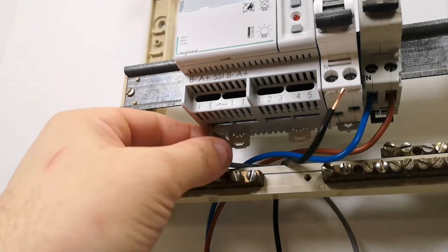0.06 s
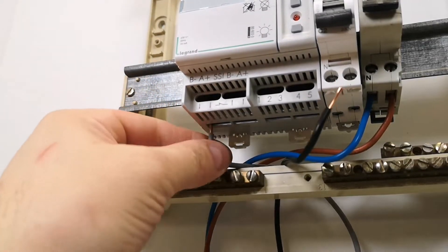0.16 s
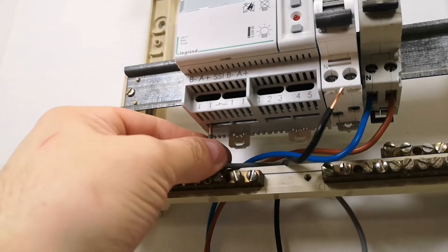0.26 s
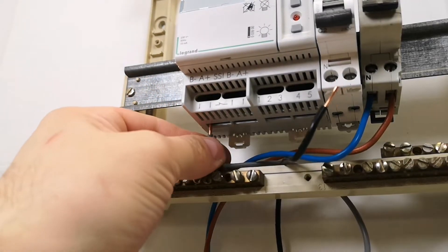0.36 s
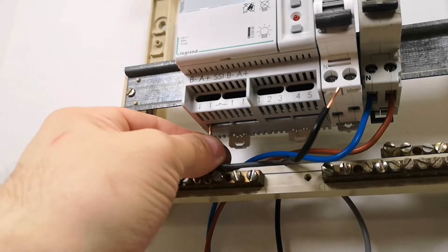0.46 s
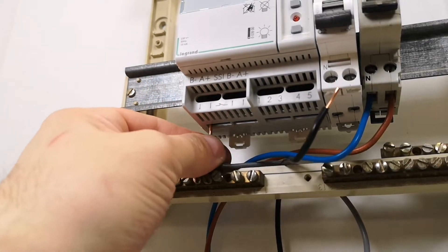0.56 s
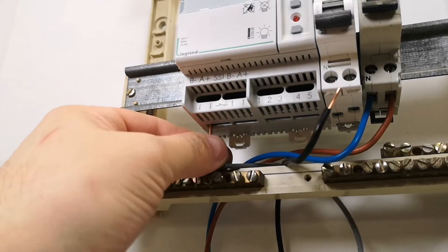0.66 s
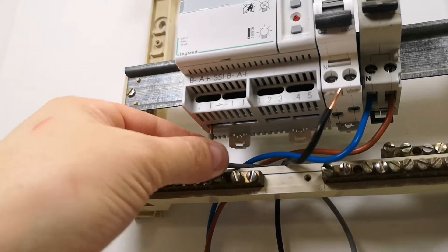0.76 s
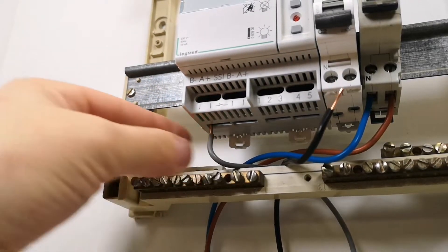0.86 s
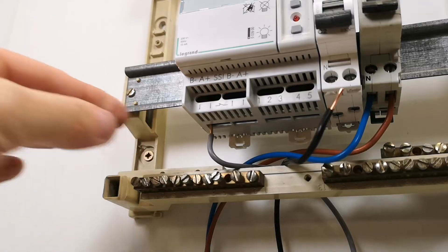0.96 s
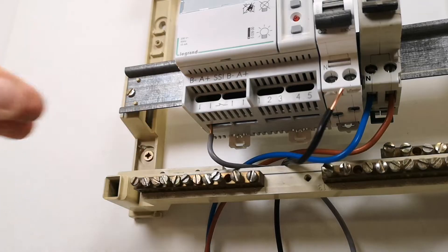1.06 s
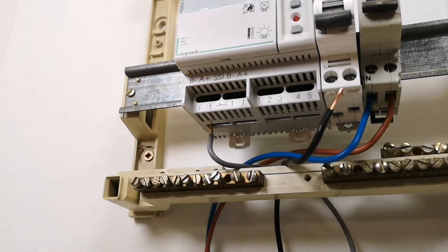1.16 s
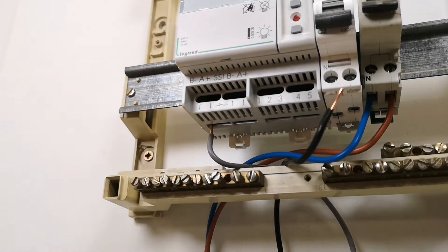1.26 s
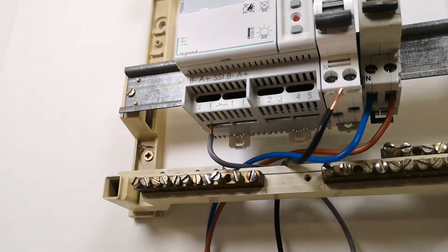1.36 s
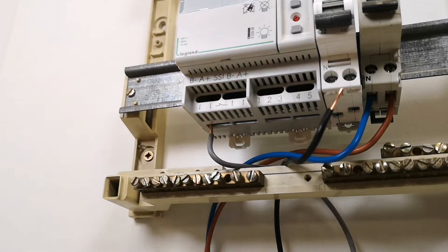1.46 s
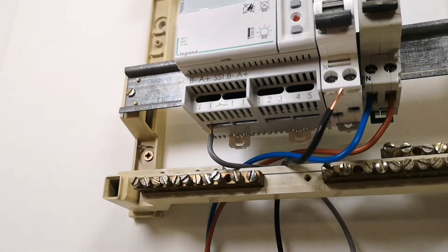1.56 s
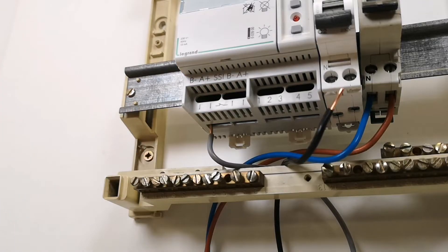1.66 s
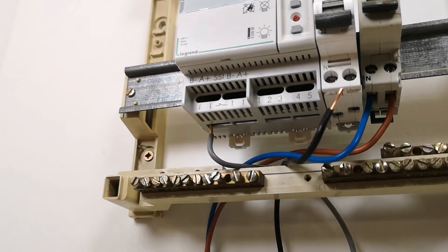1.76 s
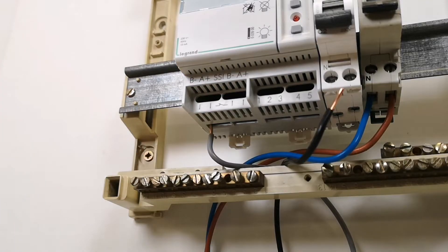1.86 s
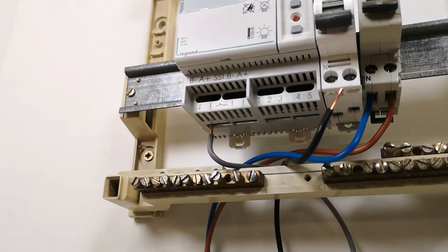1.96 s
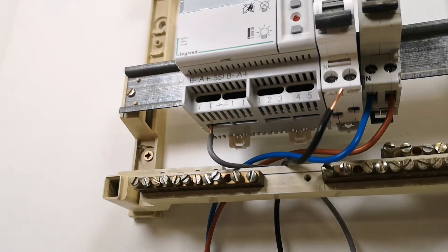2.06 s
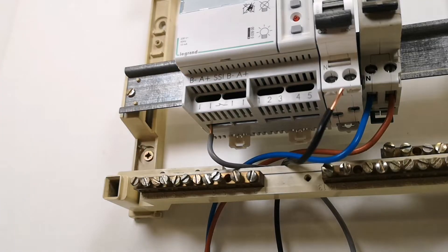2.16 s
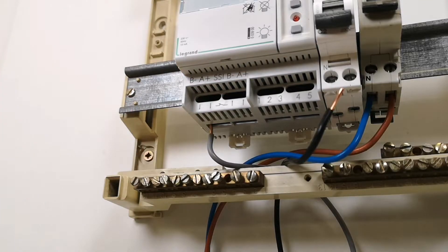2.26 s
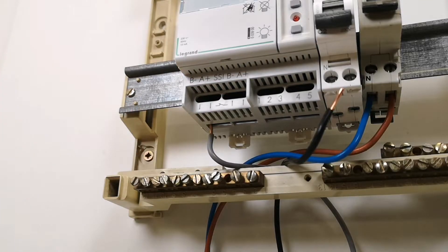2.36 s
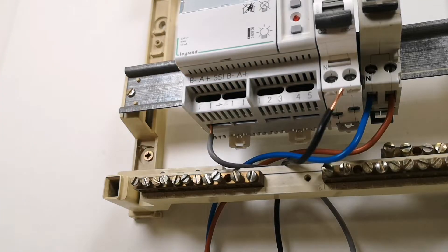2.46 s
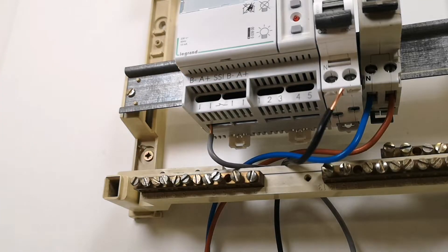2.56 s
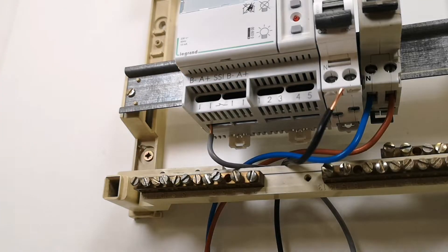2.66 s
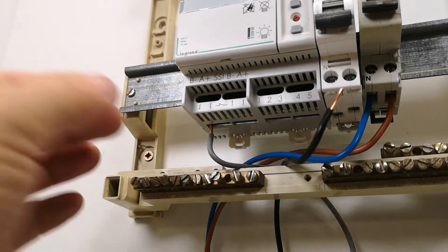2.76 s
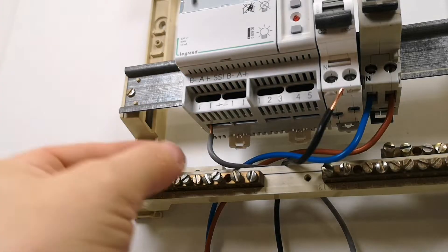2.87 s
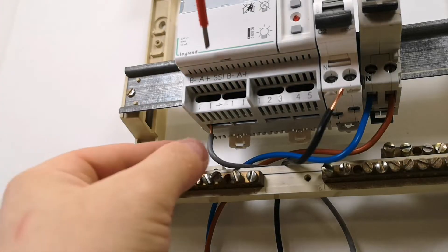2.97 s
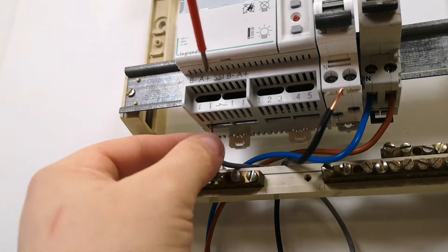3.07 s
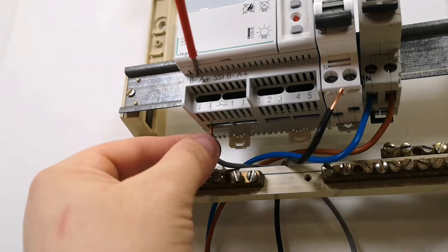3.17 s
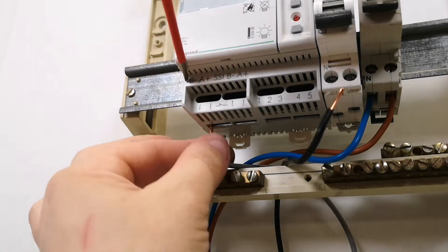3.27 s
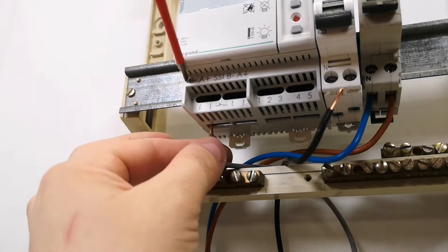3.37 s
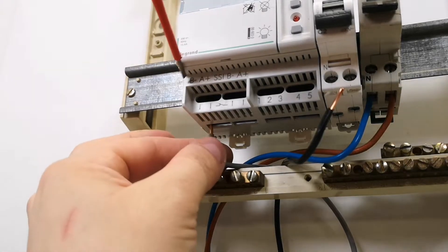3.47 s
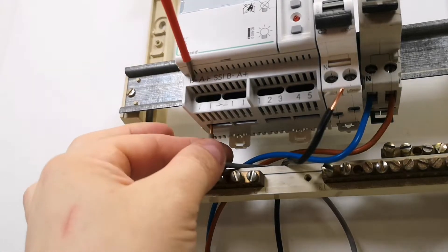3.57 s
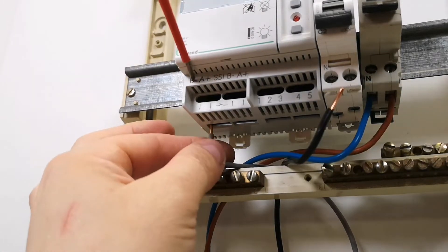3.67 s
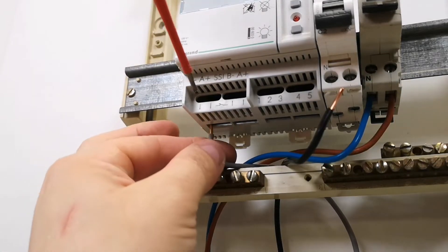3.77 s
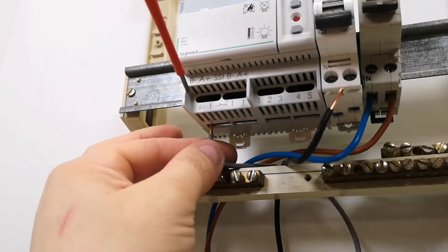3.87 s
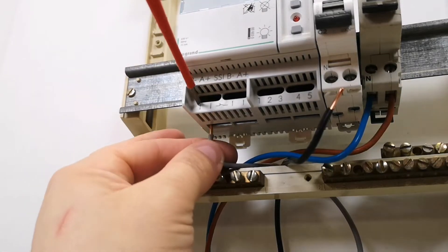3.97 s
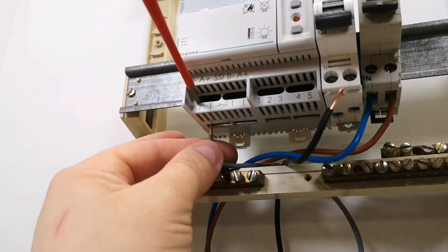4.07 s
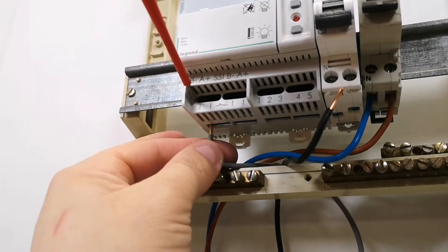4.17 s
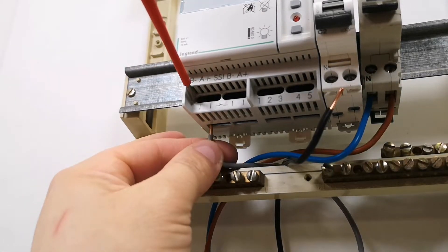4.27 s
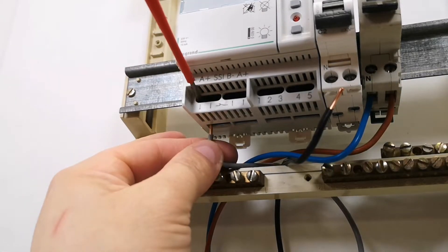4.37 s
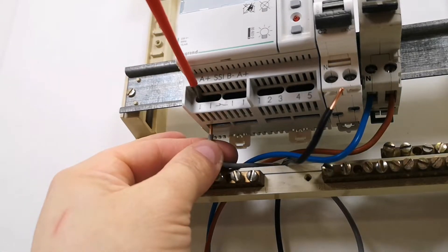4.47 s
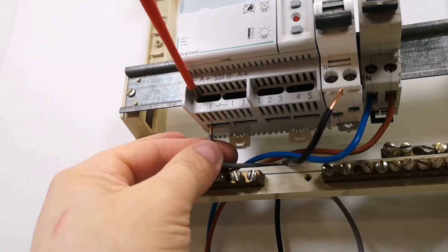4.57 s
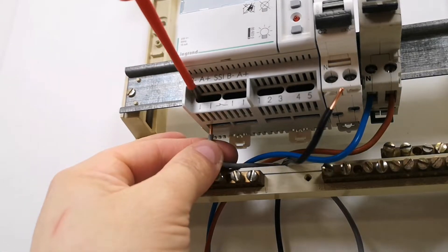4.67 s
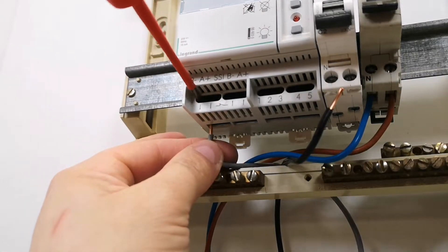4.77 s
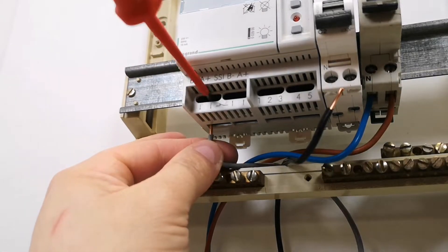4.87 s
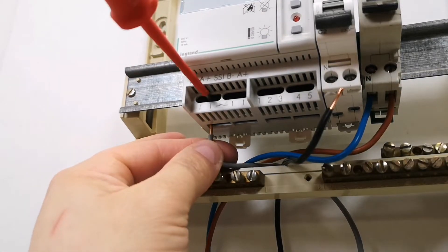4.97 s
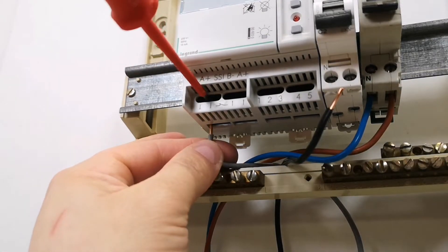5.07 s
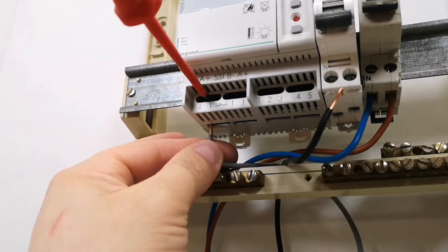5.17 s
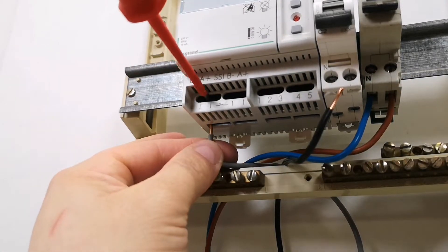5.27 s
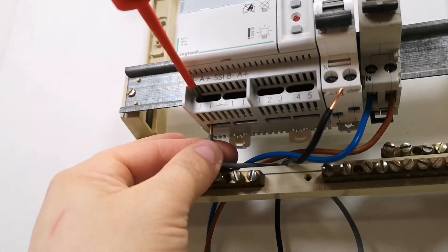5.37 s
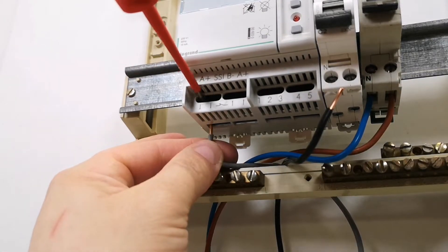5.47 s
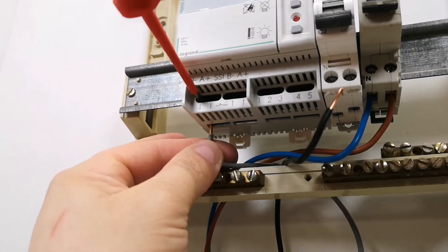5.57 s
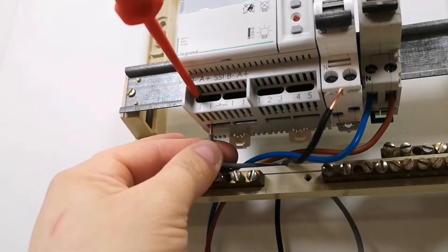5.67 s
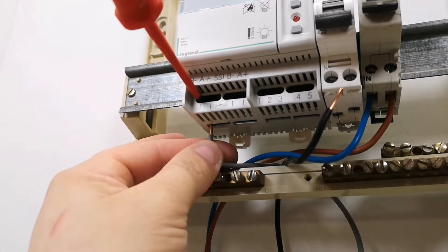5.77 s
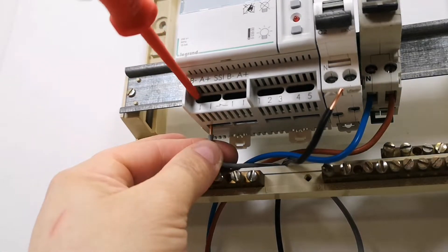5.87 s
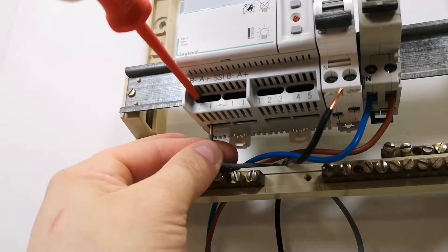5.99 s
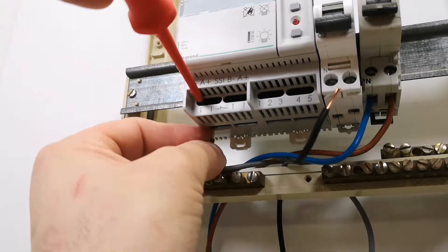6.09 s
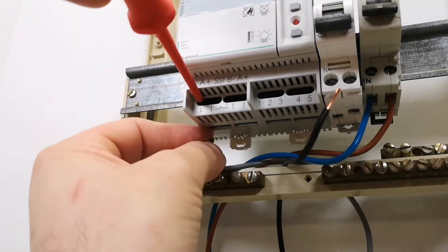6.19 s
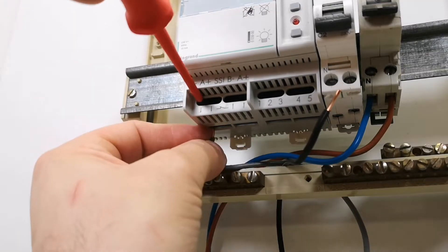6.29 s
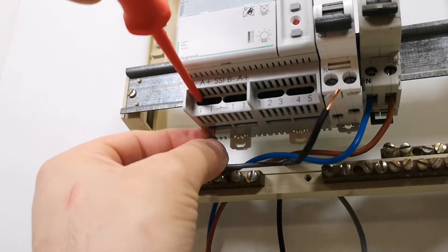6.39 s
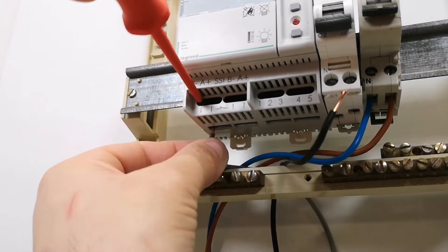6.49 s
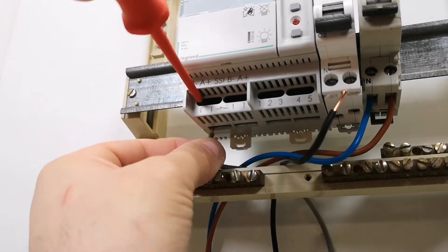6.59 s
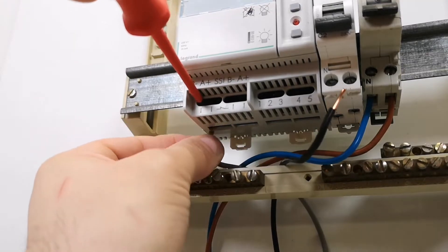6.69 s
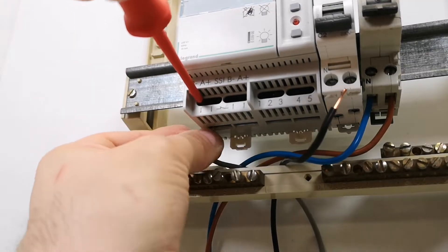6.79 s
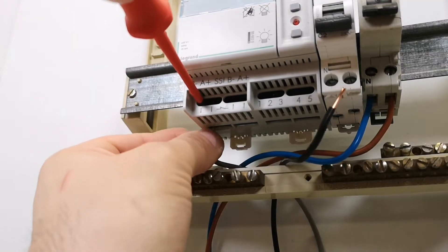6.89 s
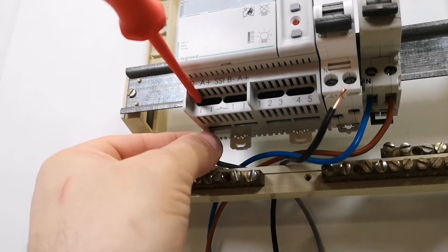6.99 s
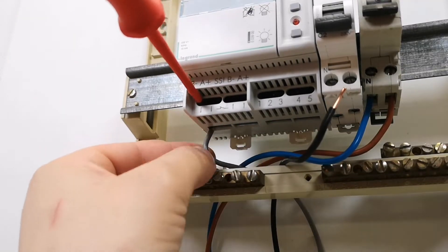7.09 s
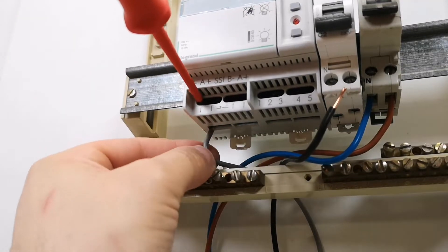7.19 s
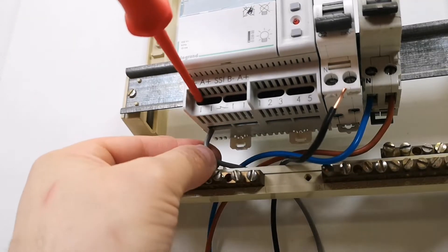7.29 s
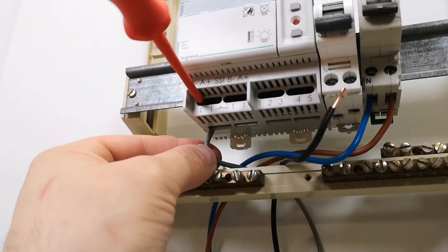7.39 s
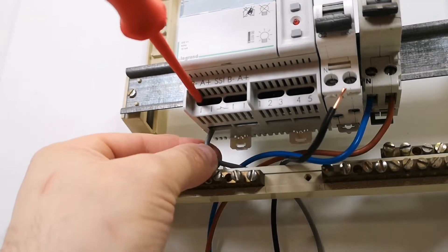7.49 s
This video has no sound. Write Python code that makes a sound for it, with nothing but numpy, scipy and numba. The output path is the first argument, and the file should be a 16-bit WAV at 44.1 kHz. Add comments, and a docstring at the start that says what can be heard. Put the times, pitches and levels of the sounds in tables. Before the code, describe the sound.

Close, scattered clicks and dull bumps of hands working a wire into a plastic screw terminal, with a faint hum underneath.

```python
"""Wiring a terminal module

Close to a phone in a small hard room, hands push a wire into a plastic module and work its screw.
Ticks ring the housing and its steel rail; thumps and finger pressure shake the board underneath.
A sleeve brushes past and a tool knocks the table off to the right. The phone's noise gate opens on
each sound, holds a moment and sinks back over faint hum and hiss."""
import sys
import numpy as np
from scipy import signal
from scipy.fft import rfft, irfft, next_fast_len
from scipy.io import wavfile
from scipy.ndimage import minimum_filter1d
from numba import njit

SR = 44100
rng = np.random.default_rng(int(sys.argv[2]) if len(sys.argv) > 2 else 0)


def transcribe(signal):
    """Save signal, clipped to [-1, 1], as a 16-bit WAV file at the path in sys.argv[1]."""
    frames = np.atleast_2d(signal).T
    limited = np.clip(frames, -1, 1)
    pcm = np.round(limited * 32767).astype(np.int16)
    wavfile.write(sys.argv[1], SR, pcm)


N = 332514

# The board's modes, from slow sway to drumming panel: (frequency [Hz], level [dB], t60 [s])
SWAY_MODES = [(42.7, -20, 0.39), (66, 4.5, 0.059)]
BEND_MODES = [(95.6, -0.5, 0.24), (118.4, 1, 0.42), (140, -1, 0.28)]
PANEL_MODES = [(161, -12, 0.14), (187, 4.5, 0.36), (226, -9, 0.32), (276.2, -13, 0.36), (306.8, -9, 0.31),
               (408, -24.5, 0.2), (630, -27.5, 0.16), (818, -23, 0.25)]
# Fingers press and slide: (time [s], hold [s], pressure level [dB], scrape level [dB])
FINGER_GRIPS = [(0.06, 0.12, -40, -54), (0.16, 0.067, -29, -51), (0.41, 0.042, -39.5, -60.5),
                (0.68, 0.1, -40, -96), (1.12, 0.024, -74, -61), (2.06, 0.13, -63, -61),
                (3.29, 0.084, -36, -48.5), (3.46, 0.09, -32, -62.5), (3.6, 0.023, -29.5, -46.5),
                (3.67, 0.033, -30.5, -57.5), (3.96, 0.012, -37.5, -58.5), (4.08, 3.3, -56, -97.5),
                (4.8, 0.037, -70.5, -66.5), (5.25, 0.022, -65, -53), (5.35, 0.074, -33, -66),
                (5.91, 0.022, -53, -89), (6.46, 0.022, -54, -71), (6.59, 0.035, -40.5, -90),
                (6.8, 0.2, -34, -51.5), (7.0, 0.021, -23.5, -46)]
GRIP_RISE_DB_PER_S, GRIP_FALL_DB_PER_S = 399.5, 219.5


def undb(db):
    return 10 ** (np.asarray(db) / 20)


def unit_rms(x):
    return x / np.sqrt(np.mean(x ** 2))


def unit_peak(x):
    return x / np.max(np.abs(x))


def coloured(x, curve):
    """Shape x by (frequency [Hz], gain [dB]) points, joined on a log-frequency axis."""
    hz, db = np.transpose(curve)
    size = next_fast_len(N, real=True)
    bins_hz = np.arange(size // 2 + 1) * SR / size
    gain = undb(np.interp(np.log(bins_hz + 1), np.log(hz), db))
    return irfft(rfft(x, size) * gain, size)[..., :N]


def band(x, hz, width_hz):
    return signal.lfilter(*signal.iirpeak(hz, hz / width_hz, fs=SR), x)


def steep_band(x, hz, width_hz):
    return band(band(x, hz, width_hz), hz, width_hz)


def place(out, time_s, x, pan_db=0.):
    """Mix x into the stereo track; pan_db is left minus right."""
    start = int(time_s * SR)
    x = x[:N - start]
    out[:, start:start + len(x)] += x * undb(np.array([[pan_db], [-pan_db]]) / 2)


def swells(gestures, column, rise_db_per_s, fall_db_per_s):
    """Gain of gestures that rise, hold and fall; the strongest at any moment counts."""
    t, db = np.arange(0, N, 32) / SR, -200.
    for gesture in gestures:
        start_s, hold_s = gesture[:2]
        before_db = rise_db_per_s * np.maximum(start_s - t, 0)
        after_db = fall_db_per_s * np.maximum(t - start_s - hold_s, 0)
        db = np.maximum(db, gesture[column] - before_db - after_db)
    return np.interp(np.arange(N) / SR, t, undb(db))


def ring(modes, length_s, scatter_db):
    """One dying sine per mode; every blow lands elsewhere, so sizes, signs and pitches vary."""
    hz, db, t60 = np.transpose(modes)[:, :, None]
    size_draw, sign_draw, pitch_draw = rng.standard_normal((len(modes), 3)).T[:, :, None]
    t = np.arange(int(length_s * SR)) / SR
    size = undb(db + scatter_db * size_draw) * np.sign(sign_draw)
    pitch_hz = hz * (1 + 0.0039 * pitch_draw)
    return size * np.sin(2 * np.pi * pitch_hz * t) * np.exp(-np.log(1000) * t / t60)


def rattle(decay_ms):
    """The noise of one contact swells in a moment and dies."""
    age = np.arange(int(.2 * SR)) / SR * 1000 / np.clip(decay_ms, .3, 40)
    return rng.standard_normal(len(age)) * np.exp(-age) * (1 - np.exp(-8 * age))


def ticks(contacts, modes, ring_db, scatter_db, pan_db):
    """Each contact rattles in a deep, a middle and a bright register and rings the modes of each."""
    out, hz = np.zeros((2, N)), np.array(modes)[:, 0]
    registers = hz < 1400, (hz > 1400) & (hz < 3600), hz > 3600
    for time_s, db, bright_db, deep_db, rattle_ms in contacts:
        crack = rattle(rattle_ms)
        ringing = ring(modes, len(crack) / SR, scatter_db)
        fizz = undb(-5.5) * band(rattle(rattle_ms / 3), 11000, 9100)
        noises = (steep_band(crack, 1054, 900), steep_band(crack, 2050, 1300),
                  steep_band(crack, 5780, 3000) + fizz)
        tones = [undb(ring_db) * unit_peak(ringing[register].sum(0)) for register in registers]
        deep, middle, bright = (unit_peak(unit_peak(noise) + tone) for noise, tone in zip(noises, tones))
        place(out, time_s, undb(db) * (middle + undb(bright_db) * bright + undb(deep_db) * deep), pan_db)
    return out


def room_tone():
    """Hiss and rumble, alike left and right in the bass only, with wavering hum and one brief tone."""
    # Spectrum of the room's air: (frequency [Hz], relative density [dB])
    air_spectrum = [(12, -23), (22, -3), (70, -6.5), (153, -11), (191, -4.5), (245, -25.5), (306, -22),
                    (416, -39), (811, -35), (1500, -35.5), (2090, -31), (4190, -45), (7310, -45.5),
                    (15500, -41.5)]
    # Hum lines: (frequency [Hz], level [dB], width [Hz])
    hum_lines = [(131.3, -72.5, 7.6), (177.3, -74.5, 3.3), (304, -82, 22)]
    mid, side = rng.standard_normal((2, N))
    side = coloured(side, [(60, -34.5), (200, -13.0), (600, 0.5)])
    hiss = undb(-52) * unit_rms(coloured(np.array([mid + side, mid - side]), air_spectrum))
    hum = sum(undb(db) * unit_rms(band(rng.standard_normal(N), hz, width)) for hz, db, width in hum_lines)
    tone_hz, tone_db, start_s, end_s = 590, -66.5, 1.83, 2.02
    t = np.arange(N) / SR
    swell = np.sin(np.pi * np.clip((t - start_s) / (end_s - start_s), 0, 1)) ** .5
    return hiss + hum + undb(tone_db) * swell * np.sin(2 * np.pi * tone_hz * t)


def wire_ticks():
    """Wire and fingers click on the plastic housing, close in front of the microphone."""
    # (time [s], level [dB], bright re middle [dB], deep re middle [dB], rattle decay [ms])
    wire_contacts = [(0.036, -38.5, -9, -5, 2.2), (0.0762, -35.5, -4.5, -22, 2.3),
                     (0.0944, -15.5, 5, -9, 3.2), (0.7559, -32.5, -29, -3, 4.1),
                     (0.8001, -33, -10.5, -5.5, 1.7), (1.0929, -39.5, -6, -13, 2.2),
                     (3.2988, -46.5, 8.5, -20, 9.2), (3.3675, -22.5, -2, -7.5, 3.6),
                     (4.3221, -23.5, -5, -2.5, 2.9), (4.4755, -37.5, -7, -1.5, 3.5),
                     (4.7058, -41, -14, -38.5, 1.4), (4.8798, -35.5, -26.5, -11, 3),
                     (5.2202, -42.5, -4, -2, 9.1), (5.2465, -23.5, -5, -2.5, 3.9),
                     (5.4504, -31, -3, -18, 1.8), (5.6526, -36.5, -12.5, -7.5, 5.4),
                     (6.0017, -39.5, -12, -13.5, 8.2), (6.0465, -32.5, -5, -7.5, 3),
                     (6.2196, -40, -28, -7, 0.82), (6.4135, -45.5, -7, -2, 7.5), (6.5625, -50, -11, 1, 2.7),
                     (6.7967, -13, -0.5, -5.5, 3.4), (6.8096, -8.5, 1, -22, 7.7),
                     (6.8174, -4, -33, -2.5, 3.6), (6.8419, -15, -5, -8.5, 7.6), (6.8714, -20, -22.5, 2, 8),
                     (6.9084, -22.5, 4.5, -16, 4.8), (6.9158, -12.5, -37, -8, 2),
                     (6.9448, -12.5, -40, 0, 2.28), (7.0734, -34, -29, -28, 2.2),
                     (7.1222, -48, -16, 14.5, 2.8), (7.5025, -41, 4, -31, 4.4)]
    # The housing's modes: (frequency [Hz], level [dB], t60 [s])
    housing_modes = [(660, -3, .05), (800, 0, .05), (960, -2, .04), (1520, -4, .025), (1700, 0, .025),
                     (1820, 0, .025), (2250, -1, .025), (2700, -5, .02), (4300, -2, .012), (5200, 0, .012),
                     (7400, -2, .01)]
    return ticks(wire_contacts, housing_modes, ring_db=-5.5, scatter_db=6.0, pan_db=-0.5)


def board_thumps():
    """The board drums, sways and bends; a softer contact pushes longer and leaves the upper modes out."""
    # Blows: (time [s], level [dB], sway re panel [dB], bend re panel [dB], contact [ms])
    blows = [(0.047, -33.5, -18, -39, 3.95), (0.08, -25.5, -30.5, -1, 6.8), (0.148, -22, -15, -0.5, 5),
             (0.386, -25.5, -15.5, 0.5, 4.34), (0.431, -30.5, -28, 2.5, 5.75),
             (0.633, -43.5, -7.5, 0.5, 4.8), (0.666, -38, -3, -23, 7.7), (0.75, -26.5, -22, -29, 4.4),
             (0.792, -28.5, -1, -2.5, 4.56), (1.099, -32, -29, -41, 5.1), (2.077, -30, -8.5, -40, 2.8),
             (2.155, -23, -11, -16.5, 1.8), (2.19, -25.5, -14, -35, 1.8), (3.241, -38, -29, -4, 0.64),
             (3.326, -30.5, -30, -23, 4.5), (3.365, -19.5, -34, -7, 3.3), (3.399, -24.5, -35, 4.5, 2.2),
             (3.538, -39.5, 25.5, 16, 6.6), (3.589, -40, 19.5, -21, 3.9), (3.639, -25, -15, 1.5, 2.9),
             (3.923, -37.5, 8, -1, 1.94), (4.316, -21, -8.5, 1, 0.78), (4.469, -29, -31, 1, 2.1),
             (4.709, -40.5, -19, 2.5, 5.8), (4.888, -34.5, -30, 1, 2), (5.208, -54.5, 11, 26, 2.1),
             (5.246, -27, -1.5, 5.5, 2.7), (5.287, -23, -5, -5, 0.95), (5.361, -34, 5, -19, 6.8),
             (5.63, -53, -18, 9, 5), (5.791, -29, -8, 3.5, 4.9), (5.997, -37, 1.5, 8.5, 3.5),
             (6.238, -42.5, -24, -40, 7.5), (6.39, -38, 3, 1, 1.36), (6.459, -41.5, -1.5, 6.5, 4.7),
             (6.598, -35.5, -38, -26, 5.1), (6.797, -15, -32, -7.5, 1.14), (6.828, -19, -38.5, -1, 1.55),
             (6.914, -23.5, -21, 0.5, 2.4), (6.958, -20, -31.5, -26, 3.95)]
    out, length_s = np.zeros((2, N)), .7
    for time_s, db, sway_db, bend_db, contact_ms in blows:
        motions = []
        # the slower the motion, the longer the hand follows it
        for modes, stretch in (PANEL_MODES, 1), (SWAY_MODES, 4.0), (BEND_MODES, 1.5):
            push = np.hanning(int(np.clip(stretch * contact_ms, .3, 30) * SR / 1000))
            ringing = ring(modes, length_s, scatter_db=0.5).sum(0)
            motions.append(unit_peak(signal.fftconvolve(ringing, push)[:len(ringing)]))
        panel, sway, bend = motions
        place(out, time_s, undb(db) * (panel + undb(sway_db) * sway + undb(bend_db) * bend))
    return out


def finger_pressure():
    """Uneven finger force keeps the board trembling, most of all in its slow motions."""
    force = rng.standard_normal(N) * swells(FINGER_GRIPS, 2, GRIP_RISE_DB_PER_S, GRIP_FALL_DB_PER_S)
    response = sum(undb(db) * ring(modes, 0.62, scatter_db=-0.5).sum(0)
                   for modes, db in ((PANEL_MODES, -3), (SWAY_MODES, 3), (BEND_MODES, -3)))
    return signal.fftconvolve(force, response / np.sqrt(np.sum(response ** 2)))[:N]


def wire_scrape():
    """Wire slides on plastic in dense slips of uneven size."""
    # Spectrum of the slips: (frequency [Hz], relative density [dB])
    slip_spectrum = [(400, -31), (700, 3.5), (1000, -18), (1600, 0), (2200, 1.5), (2800, -6), (4500, -13.5),
                     (7500, -10.5), (9000, -20), (15000, -31)]
    slips_per_s = 1500
    slipping = rng.random(N) < slips_per_s / SR
    slips = slipping * rng.standard_normal(N) * undb(rng.exponential(size=N))
    gain = swells(FINGER_GRIPS, 3, GRIP_RISE_DB_PER_S, GRIP_FALL_DB_PER_S)
    return unit_rms(coloured(slips, slip_spectrum)) * gain


def sleeve_rustle():
    """Skin and sleeve brush past: a soft, high friction hiss, strongest near 7 kHz."""
    # (time [s], hold [s], level [dB])
    brushes = [(1.098, 0.09, -57.5), (1.836, 0.062, -64), (2.35, .14, -72), (2.51, 0.028, -62),
               (2.58, 0.15, -72.5), (2.735, 0.023, -63.5), (2.838, 0.042, -62.5), (2.96, 0.14, -68.5),
               (7.3, .14, -71.5)]
    noise = rng.standard_normal((2, N))
    friction = steep_band(noise, 7200, 1100) + undb(-3) * band(noise, 5400, 2000)
    return unit_rms(friction) * swells(brushes, 2, rise_db_per_s=900, fall_db_per_s=600)


def tool_knocks():
    """A tool knocks the table off to the right and rings briefly."""
    # (time [s], level [dB], bright re middle [dB], deep re middle [dB], rattle decay [ms])
    knocks = [(2.0782, -11.5, -43, -13, 5.9), (2.1565, -24.5, -40, 5, 1), (2.1744, -23.5, -15, 2.5, 1.3)]
    # Modes of the tool on the table: (frequency [Hz], level [dB], t60 [s])
    tool_modes = [(540, -10, .04), (660, -9, .04), (800, 0, .06), (960, -4, .03), (1150, -5, .03),
                  (1520, 0, .04), (1650, -2, .025), (1870, -1, .025), (2430, -8, .03), (4000, 0, .015),
                  (5800, -3, .012), (7300, -3, .012)]
    return ticks(knocks, tool_modes, ring_db=9, scatter_db=3.5, pan_db=-4)


def screwdriver_ticks():
    """The blade catches on the screw and rings the module on its steel rail."""
    # (time [s], level [dB], bright re middle [dB], deep re middle [dB], rattle decay [ms])
    blade_contacts = [(3.2453, -37, -27, -12, 7.8), (3.56, -23, -8.5, -20, 3.1),
                      (3.6401, -31.5, -2, -7.5, 7.1), (3.8499, -26.5, -3.5, -44, 2.25),
                      (3.9305, -37, -7, -5.5, 16), (3.9847, -33.5, -4, -37, 9.5),
                      (4.7184, -17, 1, -16.5, 1.56), (4.9029, -39, 7, -5, 1.7), (5.017, -49, -24, -4, 3.6),
                      (5.3603, -10.5, -4.5, -11, 4.3), (5.7071, -31.5, 3.5, -10.5, 2.7),
                      (5.9175, -32, 5, -19, 1.5), (6.4603, -39, -4.5, -25, 9.5), (6.716, -51, 7, -22, 2.7)]
    # Modes of the module on its rail: (frequency [Hz], level [dB], t60 [s])
    rail_modes = [(1020, -6, .07), (1110, -2, .07), (1200, -3, .09), (1620, -13, .04), (1990, -5, .035),
                  (2175, 0, .1), (2265, -8, .06), (2640, -14, .06), (2850, -15, .05), (3190, -13, .04),
                  (4200, -4, .018), (4950, -4, .025), (5580, -3, .02), (5800, 0, .025), (7000, -5, .015),
                  (7480, -4, .015)]
    return ticks(blade_contacts, rail_modes, ring_db=-0.5, scatter_db=2.0, pan_db=-0.2)


def room_reverb(direct):
    """Hard walls close by return a short noise tail to each channel, dying faster in the treble."""
    # The room's decay: (frequency [Hz], t60 [s])
    decay_times = [(250, 0.21), (1000, 0.29), (4000, 0.18), (12000, 0.18)]
    hz, t60 = np.transpose(decay_times)
    t = np.arange(int(.8 * SR)) / SR
    tail = 0
    for centre_hz in 250 * 2. ** np.arange(0, 6, .5):
        decay = np.exp(-np.log(1000) * t / np.interp(np.log(centre_hz), np.log(hz), t60))
        tail = tail + band(rng.standard_normal((2, len(t))), centre_hz, centre_hz / 3.8) * decay
    tail *= 1 - np.exp(-t / 0.0009)
    return signal.fftconvolve(direct, tail / np.sqrt(np.sum(tail[0] ** 2)), axes=1)[:, :N]


@njit
def follow(x, rise_s, fall_s):
    """Envelope with its own time constants up and down."""
    envelope, level = np.empty(len(x)), 0.
    for i in range(len(x)):
        level += (x[i] - level) / (SR * (rise_s if x[i] > level else fall_s))
        envelope[i] = level
    return envelope


def noise_gate(x, open_db, slope, depth_db, hold_s, close_s):
    """Gain falls with the level under a threshold; it opens at once, holds, then closes slowly."""
    rumble_cut = signal.butter(2, 90, "high", fs=SR, output="sos")
    rectified = np.abs(signal.sosfilt(rumble_cut, x)).mean(0)
    level_db = 20 * np.log10(follow(rectified, 0.0005, 0.0093) + 1e-9)
    target_db = np.clip(slope * (level_db - open_db), -depth_db, 0)
    hold = int(hold_s * SR)
    held_db = -minimum_filter1d(-target_db, hold, origin=(hold - 1) // 2)
    return x * undb(follow(held_db + depth_db, 0.00074, close_s) - depth_db)


def scene():
    """What reaches the phone's two microphones, through the air and through its stand."""
    near = screwdriver_ticks() + wire_ticks() + tool_knocks() + wire_scrape()
    reverb = undb(-2) * room_reverb(near)
    near[0] = np.roll(near[0], 26)  # the left microphone is a little further from the module
    board = board_thumps() + finger_pressure()
    # the board comes up through the stand: alike on both sides in the bass, less so higher up
    side = coloured(np.roll(board, 90, axis=1)[0], [(30, -26), (190, -20), (320, -7), (600, 8)])
    return near + reverb + board + np.array([side, -side]) + sleeve_rustle() + room_tone()


def record(dry):
    """The phone dulls the top, gates quiet sound, adds thin hiss, rounds peaks and cuts off at 16 kHz."""
    # The microphone thins the deepest bass and the treble: (frequency [Hz], gain [dB])
    mic_response = [(18, -9), (40, -2.5), (320, -2), (460, -2), (640, -1.5), (6000, -2), (8200, -4.5),
                    (9300, -10.5), (15000, -21)]
    picked_up = coloured(dry, mic_response)
    gated = noise_gate(picked_up, open_db=-45, slope=1.4, depth_db=14, hold_s=0.039, close_s=0.06)
    hiss = undb(-92) * np.diff(rng.standard_normal((2, N + 1)))
    rounded = .8 * np.tanh((gated + hiss) / .8)
    return signal.sosfilt(signal.ellip(10, .2, 80, 16000, fs=SR, output="sos"), rounded)


dry = scene()
out = record(dry)
transcribe(out)
```